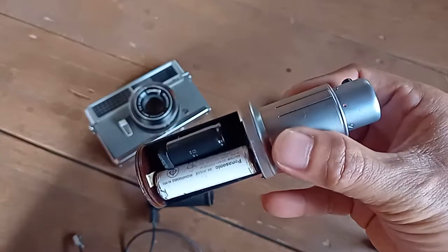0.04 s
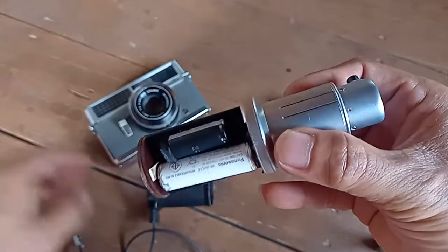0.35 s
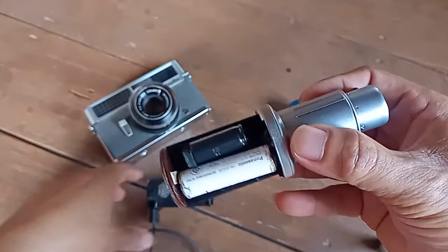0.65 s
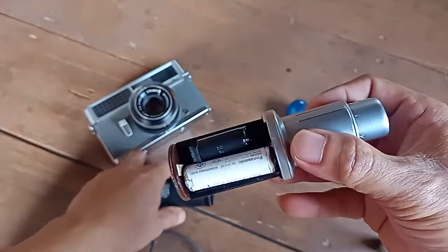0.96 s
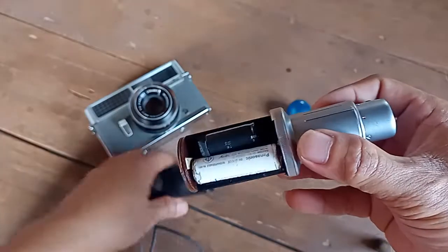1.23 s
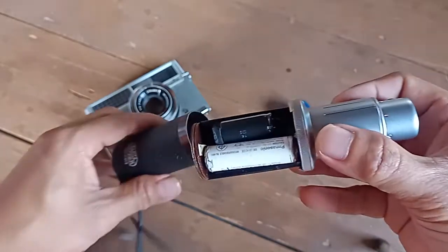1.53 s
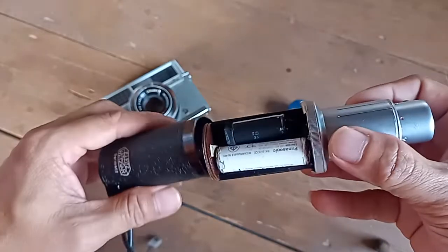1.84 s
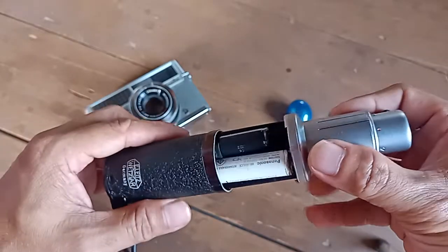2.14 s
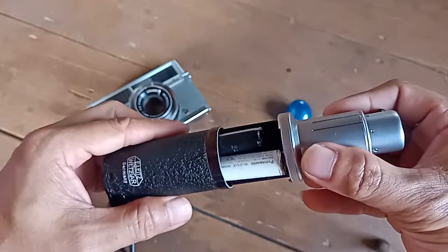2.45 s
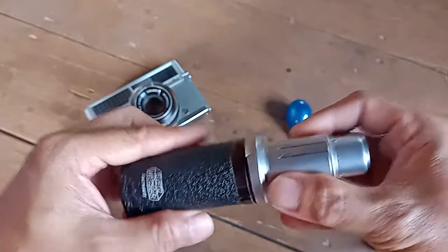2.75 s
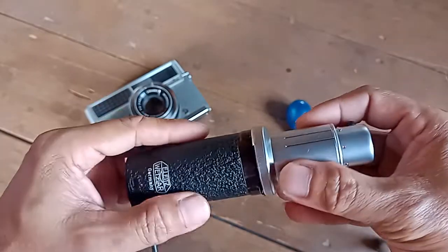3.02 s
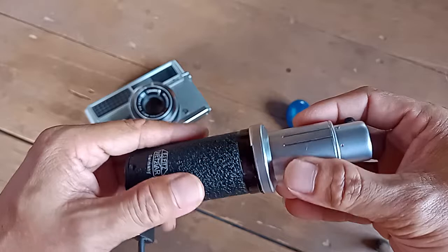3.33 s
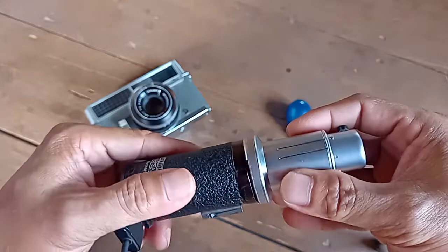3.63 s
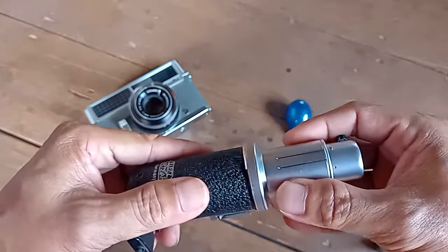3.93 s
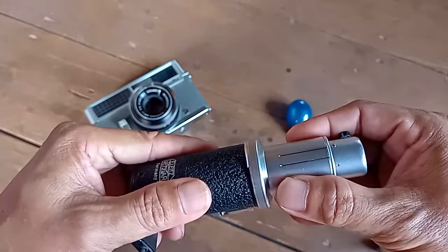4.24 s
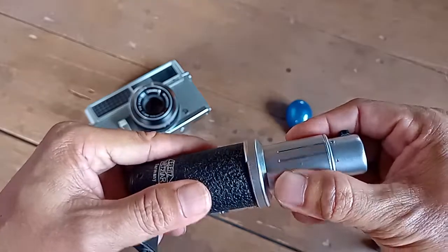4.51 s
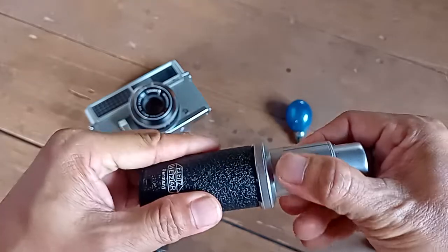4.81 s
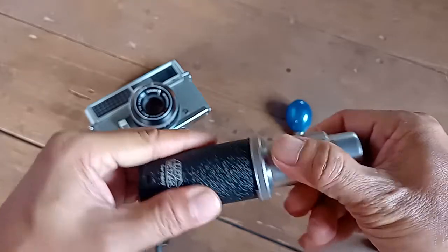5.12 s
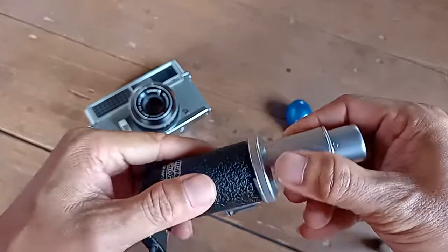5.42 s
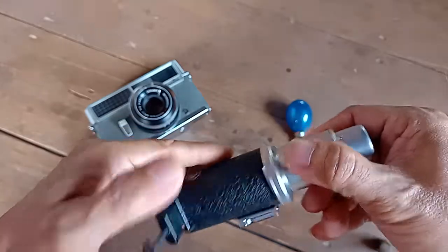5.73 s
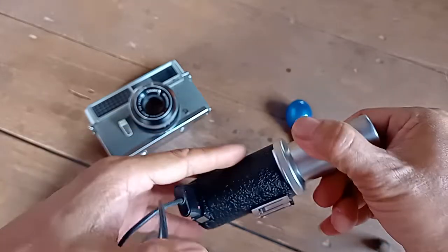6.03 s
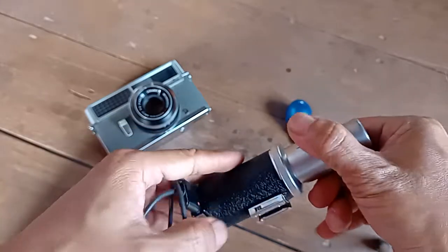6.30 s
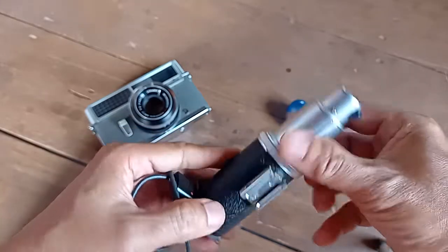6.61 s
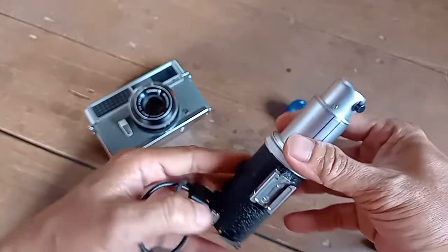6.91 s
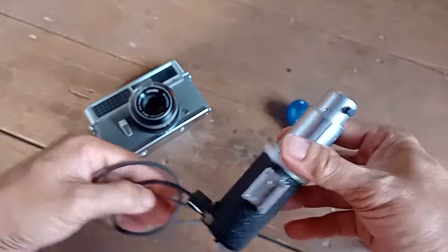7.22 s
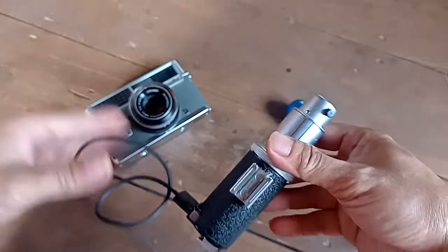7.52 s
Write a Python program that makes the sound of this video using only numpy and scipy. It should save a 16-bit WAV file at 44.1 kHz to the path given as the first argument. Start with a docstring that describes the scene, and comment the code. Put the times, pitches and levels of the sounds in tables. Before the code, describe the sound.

Hands fit together a small metal flash unit close to a stereo microphone, over the faint hum and hiss of a small room. Arms brushing the stand cause dull thumps and low rumble throughout, strongest near 0.4, 1.3, 2, 6 and 6.6 seconds. Fingers rub softly at about 1.6 seconds. At 2.1 the sleeve catches on the tube with a small click and scrapes along it in tiny slips. A quick scrape and cluster of clicks end in a sharp, bright snap just before 3 seconds. Another crisp click follows at 3.75, a hollower one at 4.1, and a faint scrape at 4.8. As the unit is turned over, a thin metal bracket ticks and rings briefly at 5.7 and 6 seconds. The case knocks at 6.6, fingers and cord rub quietly around 7, and one more light knock comes at about 7.5 seconds.

```python
"""A small room, with a stereo microphone on a stand close to two hands and a small metal flash unit.
The hands slide a sleeve over the battery tube, snap it home and turn the unit over. The tube scrapes
in tiny slips and clicks where the sleeve catches, the cord rubs and knocks on the case, and a thin
metal bracket rings. Arms brushing and bumping the stand reach the microphone through it as dull
thumps. Under it all lie a quiet room hum and hiss."""
import sys
import numpy as np
from scipy import signal
from scipy.fft import rfft, irfft
from scipy.io import wavfile

SR = 44100
rng = np.random.default_rng(int(sys.argv[2]) if len(sys.argv) > 2 else 0)


def to_wav(s):
    """Save 16-bit WAV."""
    ch = np.atleast_2d(s).T  # columns
    pcm = np.round(np.clip(ch, -1, 1) * 32767)  # PCM
    wavfile.write(sys.argv[1], SR, pcm.astype(np.int16))


N = 337806
TIME = np.arange(N) / SR
FREQ = np.maximum(np.arange(N // 2 + 1) * SR / N, 1)

# Bright resonances of the battery tube. Each row: frequency in Hz, width in Hz, level in dB.
TUBE_MODES = [(4000, 500, -16.5), (5380, 260, -7), (6200, 540, -13), (7700, 890, -2), (8420, 280, 8.5),
              (9400, 630, -5.5), (11500, 800, 3), (12200, 890, 9.5), (15500, 920, -26)]
# Soft resonances of the case in the hand. Each row: frequency in Hz, width in Hz, level in dB.
CASE_MODES = [(782, 110, 2), (959, 230, -1.5)]


def undb(db):
    """Decibels to gain."""
    return 10 ** (np.asarray(db) / 20)


def unit(x):
    """Scale to rms 1."""
    return x / np.sqrt(np.mean(x ** 2) + 1e-18)


def peak(x, db):
    """Scale to a peak level."""
    return x * undb(db) / np.abs(x).max()


def add(track, s, sound):
    """Mix a sound into a track from time s."""
    start = max(int(s * SR), 0)
    track[start:start + len(sound)] += sound[:N - start]


def cut(x, hz, kind, order=4):
    """Low-pass or high-pass filter."""
    sos = signal.butter(order, min(hz, SR / 2 - 100), kind, fs=SR, output="sos")
    return signal.sosfilt(sos, x + 1e-18)


def colour(x, points):
    """Filter by a spectrum of (Hz, dB) points."""
    hz, db = np.transpose(points)
    return irfft(rfft(x) * undb(np.interp(np.log(FREQ), np.log(hz), db)), N)


def ring(modes, size=1024):
    """Impulse response of (Hz, width in Hz, dB) resonances."""
    t = TIME[:size]
    return sum(undb(db) * width * np.exp(-np.pi * width * t) * np.cos(2 * np.pi * hz * t)
               for hz, width, db in modes)


def resonate(force, modes, lowest_hz):
    """A force rings a small part, which radiates little below lowest_hz."""
    return cut(signal.fftconvolve(force, ring(modes))[:len(force)], lowest_hz, "high")


def wander(rate):
    """A random curve with a spread near 1 and rate turning points a second."""
    knots = rng.standard_normal(4000)
    return np.interp(TIME * rate, np.arange(len(knots)), knots)


def friction(rate, spread_db):
    """Tiny slips of uneven size, about rate a second, at rms 1."""
    slips = (rng.random(N) < rate / SR) * rng.standard_normal(N)
    return unit(slips * undb(spread_db * rng.standard_normal(N)))


def contact(decay_s, chatter, size=2048):
    """One sharp blow and a brief dying chatter of the two surfaces."""
    t = TIME[:size]
    return (t == 0) + chatter * rng.standard_normal(size) * np.exp(-t / decay_s)


def swell(s, rise_s, fall_s, shape=0.93):
    """Gain of a stroke: 1 at its fastest moment s, 20 dB down rise_s before and fall_s after."""
    away = np.maximum((s - TIME) / rise_s, (TIME - s) / fall_s)
    gain, near = np.zeros(N), away < 4
    gain[near] = undb(-20 * away[near] ** shape)
    return gain


def strokes(rows):
    """Gain of a series of rubbing strokes."""
    return sum(undb(db) * swell(s, rise_s, fall_s) for s, rise_s, fall_s, db in rows)


def room_tone(noise_db=-53.22, drone_db=-62):
    """Low room noise, droning at a few pitches, with the microphone's hiss on top."""
    # Spectrum of hum and hiss. Each row: frequency in Hz, relative density in dB.
    hum_spectrum = [(25, 4.9), (60, 2.5), (130, -3), (200, -4), (320, -6.5), (420, -10.5), (850, -13.5),
                    (1800, -19.5), (3000, -28.5), (4500, -33.5), (6000, -39.5), (10500, -29), (12500, -31),
                    (15500, -37.5)]
    # Stereo width of that noise. Each row: frequency in Hz, side minus mid in dB.
    hum_width = [(60, -12), (250, -8.5), (600, -1.5), (2400, -1), (5000, 1.5), (10000, -10), (15000, 1)]
    # Narrow resonances in the room noise. Each row: frequency in Hz, width in Hz, level in dB.
    drone_modes = [(192, 11, -21), (239.5, 3.5, -0.5), (325, 1.6, 7.5), (494, 2.4, 2)]
    mid, side = (unit(colour(noise, hum_spectrum)) for noise in rng.standard_normal((2, N)))
    side = colour(side, hum_width)
    drone = unit(signal.fftconvolve(rng.standard_normal(N), ring(drone_modes, size=16384))[:N])
    drone = cut(drone, 530, "low") * undb(drone_db)
    return np.array([mid + side, mid - side]) * undb(noise_db) + drone


def stand_rumble(attack_s=0.033, release_s=0.07, sag_db_per_s=14):
    """An arm rubs the stand: each brush sets in, sags and lets go; the fades are times for 20 dB."""
    # Brushes of the arm. Each row: start in seconds, length in seconds, level in dB.
    brushes = [(0.116, 0.0078, -39), (0.269, 0.068, -37.5), (0.369, .18, -25.5), (0.605, .11, -44.5),
               (1.036, 0.0099, -43), (1.206, 0.12, -30), (1.296, 0.4, -29), (1.59, 0.14, -36),
               (1.713, 0.085, -46), (1.962, 0.084, -18), (2.175, 0.0092, -39.5), (2.546, .21, -31.5),
               (2.838, 0.092, -28), (3.128, 0.1, -33.5), (3.238, 0.051, -23.5), (3.322, 0.046, -32),
               (3.537, 0.12, -35), (3.723, 0.037, -31.5), (3.999, .045, -26), (4.117, 0.071, -34),
               (4.529, 0.22, -34.5), (4.786, 0.13, -26.5), (5.017, 0.057, -40.5), (5.114, 0.18, -31),
               (5.3, 0.15, -45), (5.563, 0.097, -20.5), (5.893, 0.27, -30), (6.306, .03, -46.5),
               (6.417, 0.2, -31.5), (6.523, 0.18, -26.5), (6.75, 0.1, -47), (7.496, .1, -44.5)]
    stand_response = [(20, -16.5), (35, -2), (50, 8), (75, 8), (120, -3), (200, -17.5),
                      (320, -26), (600, -55), (2000, -101)]  # Each row: frequency in Hz, gain in dB.
    level_db = np.full(N, -np.inf)
    for s, length_s, db in brushes:
        t = TIME - s
        fade = np.maximum(-t / attack_s, 0) + np.maximum((t - length_s) / release_s, 0)
        level_db = np.maximum(level_db, db - 20 * fade - sag_db_per_s * np.maximum(t, 0))
    rumble = unit(colour(friction(rate=260, spread_db=3.2), stand_response))
    return rumble * undb(level_db)


def jolt(hz, turns, size):
    """A soft push and rebound of the heavily damped stand, centred in its window."""
    t = TIME[:size] - size / 2 / SR
    return np.imag((1 - 2j * np.pi * hz * t / turns) ** -(turns + 1))


def stand_bumps(clunk_hz=290, clunk_db=-12, hardening=2.15, pushes=4, size=4096):
    """An arm bumps the stand, which rocks back in rebounds of falling pitch."""
    # Each row: time in seconds, level in dB, pitch in Hz, loss at the first rebound in dB.
    bumps = [(0.376, -17, 88, 12), (0.407, -5.5, 112, 7.5), (0.499, -22.5, 93, 10),
             (1.285, -12.5, 162, 3.5), (1.298, -7.5, 113, 7), (1.487, -15, 86, 2), (1.948, -22, 220, 7),
             (1.969, -1, 144, 2.5), (1.982, -15.5, 280, 10), (2.574, -21.5, 79.4, 7),
             (2.891, -24.5, 94, 22), (3.251, -17, 111, 3), (4.022, -20, 107, 16), (4.793, -17, 93, 13),
             (4.873, -16.5, 115, 20), (4.966, -18, 93, 3), (5.164, -17, 87, 30), (5.556, -14.5, 116.6, 8),
             (5.592, -9.5, 117, 3.5), (5.598, -14, 267, 17), (5.944, -18, 228, 4), (5.951, -4.5, 110, 2.5),
             (5.97, -11, 192, 2.5), (6.003, -8.5, 120, 9), (6.472, -29.5, 205, -1), (6.503, -14, 113, 12),
             (6.552, -12, 167, 7), (6.563, -7.5, 81.5, 24), (6.615, -11, 102, 20), (6.673, -23, 175, 10),
             (6.698, -15.5, 88, 14)]
    rock_s, scatter, pitch_ratio, loss_power = 0.019, 0.14, 0.86, 1.5
    out, lead_s = np.zeros(N), size / 2 / SR
    all_gaps = rock_s * (1 + scatter * rng.standard_normal((len(bumps), pushes)))
    for (s, db, hz, loss_db), gaps in zip(bumps, all_gaps):
        # Contact stiffens with force, so only hard bumps reach the stand's higher resonance.
        clunk = undb(clunk_db + hardening * db) * jolt(clunk_hz, turns=6.7, size=size)
        add(out, s - lead_s, clunk)
        for k in range(pushes):
            push = jolt(hz * pitch_ratio ** k, turns=5.24, size=size)
            add(out, s + gaps[:k].sum() - lead_s, undb(db - loss_db * k ** loss_power) * push)
    return out


def case_knocks():
    """Sleeve, cord, plug and fingers hit the case: the softer the contact, the duller the knock."""
    # Each row: time in seconds, peak in dB, pitch of the hollow ring in Hz, treble cutoff in Hz.
    knocks = [(1.286, -46.5, 1825, 800), (2.491, -45.5, 1920, 4340), (4.0936, -37, 1960, 5500),
              (5.289, -39, 1980, 3000), (5.678, -38, 1810, 770), (6.023, -39.5, 1810, 696),
              (6.565, -25, 1630, 2400), (7.337, -38.5, 1800, 805), (7.5569, -25, 1970, 5000)]
    # Upper resonances of the case. Each row: frequency in Hz, width in Hz, level in dB.
    clack_modes = [(1490, 500, 3), (2740, 1200, -17), (5000, 1600, -25)]
    out = np.zeros(N)
    for s, db, ring_hz, top_hz in knocks:
        modes = CASE_MODES + clack_modes + [(ring_hz, 380, 3)]
        knock = resonate(contact(decay_s=0.0047, chatter=0.05), modes, lowest_hz=496)
        add(out, s, peak(cut(knock, top_hz, "low", order=6), db))
    return out


def finger_rubs(waver_db=3.0):
    """Fingers brush the sleeve and draw the cord through; a shifting grip sounds the case."""
    # Skin on sleeve and cord. Each row: fastest moment, rise and fall in seconds, level in dB,
    # treble cutoff in Hz.
    rubs = [(1.58, 0.084, 0.21, -54.5, 3300), (1.8, .1, 0.57, -66, 3300), (6.905, 0.061, .4, -54, 1600),
            (7.12, 0.17, 0.33, -63, 1500), (7.345, 0.12, 0.11, -51.5, 1000)]
    # Spectrum of rubbing skin. Each row: frequency in Hz, gain in dB.
    skin_spectrum = [(200, -21.5), (400, 1.5), (750, -2.5), (1250, 2), (2000, -9.5), (3500, -14.5),
                     (8000, -21), (16000, -56.5)]
    # Shifts of the grip. Each row: fastest moment, rise and fall in seconds, level in dB.
    grips = [(3.732, 0.0094, 0.036, -37.5), (3.93, 0.065, 0.054, -57), (4.094, 0.026, 0.05, -42),
             (5.89, .09, 0.093, -55), (6.032, 0.054, 0.019, -40), (6.27, 0.27, 0.29, -60),
             (6.585, 0.029, 0.07, -43.5), (6.74, 0.19, 0.17, -58.5)]
    slips = friction(rate=2100, spread_db=-2.5) * undb(waver_db * wander(40))
    skin = colour(slips, skin_spectrum)
    rub = sum(unit(cut(skin, top_hz, "low")) * undb(db) * swell(s, rise_s, fall_s)
              for s, rise_s, fall_s, db, top_hz in rubs)
    grip = unit(cut(resonate(slips, CASE_MODES, lowest_hz=590), 550, "low"))
    return rub + grip * strokes(grips)


def sleeve_clicks(ring_width_hz=75):
    """The sleeve catches on the tube and snaps home; its hollow ring depends on where it is struck."""
    # Each row: time in seconds, peak of the bright edge in dB, hollow ring against the edge in dB,
    # ring pitch in Hz, case knock against the edge in dB, treble cutoff of the edge in Hz.
    clicks = [(2.103, -47.5, -1, 1700, -11, 9140), (2.1414, -25, -9.5, 1940, -24, 13200),
              (2.3284, -46.5, 6, 1660, 0, 8900), (2.9062, -33.5, -3, 1970, -2, 9000),
              (2.9144, -37, 7.5, 2560, 5, 12000), (2.949, -27, -4, 2670, -21, 15000),
              (2.965, -3, -15, 1880, -17, 17100), (3.721, -31, -12, 1430, -25, 6000),
              (3.7488, -37, 7.5, 1860, -10, 8000), (3.7581, -13.5, -16, 2240, -16.5, 9300),
              (3.7607, -16.5, -12.5, 2570, -13, 11000), (4.077, -40.5, 3, 2100, 8, 5000),
              (4.093, -23.5, 2.5, 2065, -3, 4000)]
    out = np.zeros(N)
    for s, db, ring_db, ring_hz, knock_db, top_hz in clicks:
        edge = resonate(contact(decay_s=0.0047, chatter=0.1), TUBE_MODES, lowest_hz=3000)
        edge = cut(edge, top_hz, "low", order=2)
        blow = contact(decay_s=0.0013, chatter=0.36)
        hollow = resonate(blow, [(ring_hz, ring_width_hz, 0)], lowest_hz=1340)
        case = cut(resonate(blow, CASE_MODES, lowest_hz=680), 1700, "low")
        add(out, s, peak(edge, db) + peak(hollow, db + ring_db) + peak(case, db + knock_db))
    return out


def sleeve_scrapes(judder_db=1.6):
    """The sleeve scrapes along the tube, gripping and letting go."""
    # Each row: fastest moment, rise and fall in seconds, then bright edge, hiss and hollow body in dB.
    slides = [(2.152, 0.02, 0.095, -55, -55, -54), (2.255, 0.051, 0.067, -61, -76, -68),
              (2.289, 0.047, 0.038, -57.5, -57.5, -44.5), (2.334, 0.0072, 0.037, -53, -54, -43),
              (2.88, 0.025, 0.055, -45.5, -40.5, -85), (2.957, 0.064, .018, -40.5, -39.5, -35.5),
              (3.085, 0.021, 0.083, -67, -62, -55), (3.418, 0.044, 0.05, -65.5, -67, -78),
              (3.52, 0.061, .06, -71.5, -78, -78), (3.758, 0.024, 0.039, -52, -43, -42.5),
              (4.088, 0.028, 0.02, -45.5, -47, -44), (4.766, 0.037, 0.051, -49.5, -47.5, -51.5),
              (5.02, .05, 0.22, -71, -75, -80)]
    # Hollow resonances of the sleeve. Each row: frequency in Hz, width in Hz, level in dB.
    sleeve_modes = [(1000, 590, -2.5), (1880, 460, 5), (2646, 430, 2)]
    # Colour of the surface grain. Each row: frequency in Hz, gain in dB.
    grain = [(4000, 11), (5500, 2), (7000, 11), (9800, 1.5), (12800, -12.5), (16000, -1)]
    force = friction(rate=7700, spread_db=4.5) * undb(judder_db * wander(110))
    rasp = colour(resonate(force, TUBE_MODES, lowest_hz=4000), grain)
    hiss = unit(cut(rasp, 9500, "high", order=8))
    edge = unit(cut(rasp, 7600, "low", order=8))
    body = unit(cut(resonate(force, sleeve_modes, lowest_hz=770), 2840, "low", order=8))
    out = np.zeros(N)
    for s, rise_s, fall_s, edge_db, hiss_db, body_db in slides:
        scrape = undb(edge_db) * edge + undb(hiss_db) * hiss + undb(body_db) * body
        out += swell(s, rise_s, fall_s) * scrape
    return out


def bracket(crack_db=-2, ring_db=-9.0, slip_db=-7, size=8192):
    """The thin bracket rings when it is ticked or a finger drags across it."""
    # Modes of the bracket. Each row: frequency in Hz, level in dB, seconds to fall 60 dB.
    modes = [(4590, -10, 0.11), (5340, 0.5, 0.035), (6420, 2, 0.011), (6460, 4, 0.01), (7300, -8.5, 0.077),
             (9900, -8, 0.034), (10500, -5, 0.03), (12070, 0.5, 0.038), (14420, -6, 0.046)]
    # Ticks on it. Each row: time in seconds, level in dB, treble cutoff in Hz.
    ticks = [(5.67, -29.5, 12500), (6.0177, -17.5, 6600), (6.558, -43, 11100)]
    # Finger drags. Each row: fastest moment, rise and fall in seconds, level in dB.
    drags = [(5.878, 0.078, 0.053, -64.5), (5.993, 0.074, 0.03, -42)]
    t = TIME[:size]
    chime = sum(undb(db - 60 * t / t60) * np.sin(2 * np.pi * hz * t) for hz, db, t60 in modes)
    slips = friction(rate=800, spread_db=-1.5)
    drag = unit(signal.fftconvolve(slips, chime)[:N]) + undb(slip_db) * cut(slips, 4600, "high")
    out = drag * strokes(drags)
    for s, db, top_hz in ticks:
        crack = cut(contact(decay_s=0.0031, chatter=0.71, size=size), 5000, "high")
        tick = peak(crack, db + crack_db) + peak(chime, db + ring_db)
        add(out, s, cut(tick, top_hz, "low", order=2))
    return out


def room(x, wet_db, t60_low=0.29, t60_high=0.26, split_hz=4000, gap_s=0.0068, size=22050):
    """Dense reflections of a small room; the two channels are more alike in the treble."""
    t = TIME[:size]
    mid, side = rng.standard_normal((2, size))
    side = 0.45 * side + 0.6 * cut(side, 6000, "low", order=1)
    out = []
    for noise in (mid + side, mid - side):
        low = cut(noise, split_hz, "low") * undb(-60 * t / t60_low)
        high = cut(noise, split_hz, "high") * undb(-60 * t / t60_high)
        tail = (low + high) * (t > gap_s)
        out.append(signal.fftconvolve(x, tail / np.linalg.norm(tail))[:N])
    return undb(wet_db) * np.array(out)


def microphone(x, left_db=0.17):
    """Two closely spaced ports: their difference is a quarter cycle out of step with their sum."""
    # Stereo width for close sounds. Each row: frequency in Hz, side minus mid in dB.
    port_difference = [(50, -36.5), (220, -32.5), (450, -29), (900, -6), (2000, -2), (3000, -0.5),
                       (6000, -6), (8500, -6.5), (13000, -16)]
    side = colour(irfft(1j * rfft(x), N), port_difference)
    return np.array([x - side, x + side]) * undb([[left_db], [-left_db]])


def scene():
    """Airborne sounds excite the room; the thumps travel only through the stand."""
    metal = sleeve_clicks() + bracket()
    scrape = sleeve_scrapes() + finger_rubs()
    knocks = case_knocks()
    thumps = stand_bumps() + stand_rumble()
    reflections = room(metal, wet_db=-14.0) + room(scrape, wet_db=-8.0) + room(knocks, wet_db=1.5)
    return microphone(metal + scrape + knocks + thumps) + reflections + room_tone()


def record(dry):
    """The recorder cuts the treble steeply above 15.9 kHz."""
    return signal.sosfilt(signal.ellip(10, .1, 80, 15900, fs=SR, output="sos"), dry)


dry = scene()
out = record(dry)
to_wav(out)
```